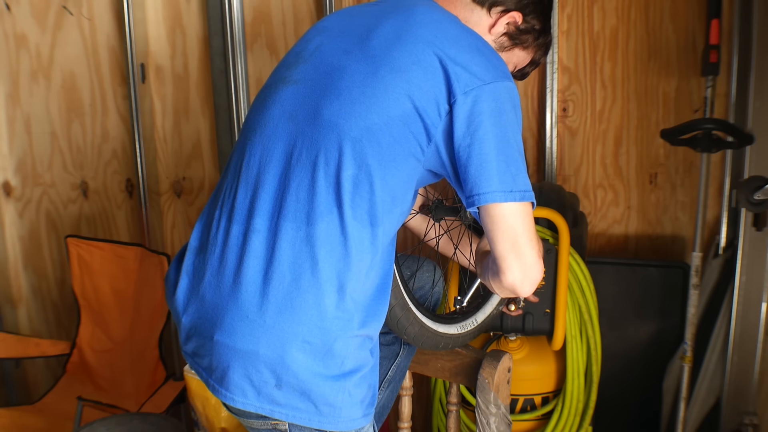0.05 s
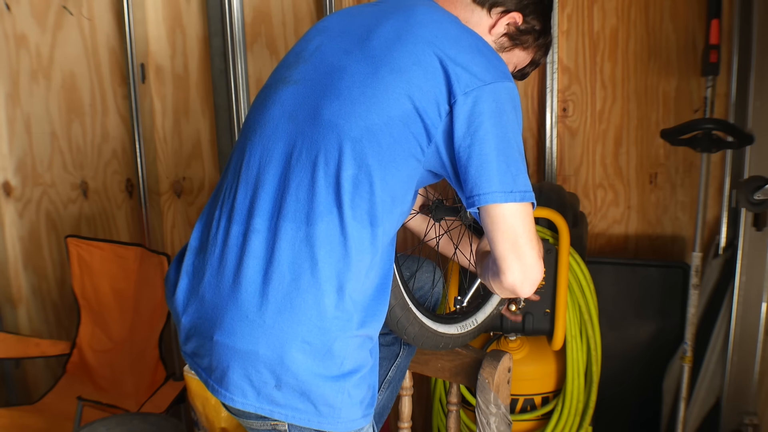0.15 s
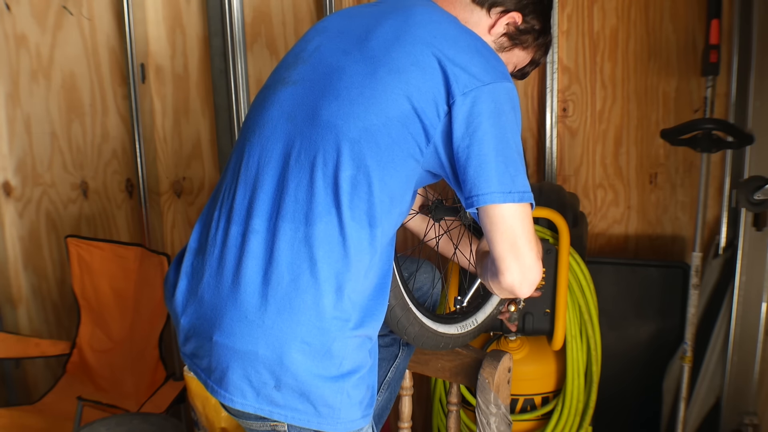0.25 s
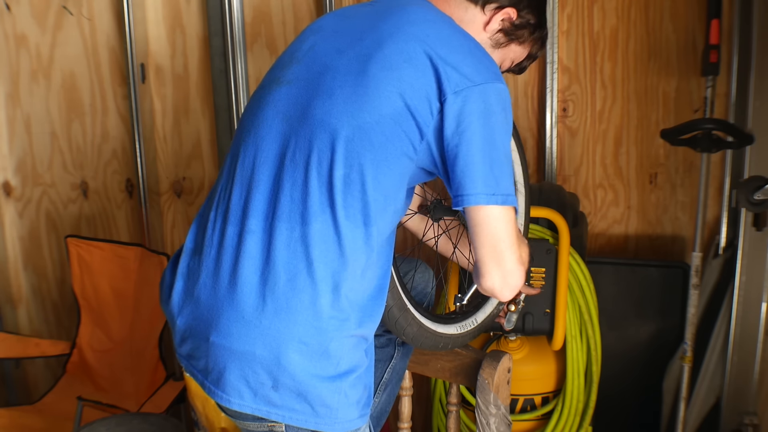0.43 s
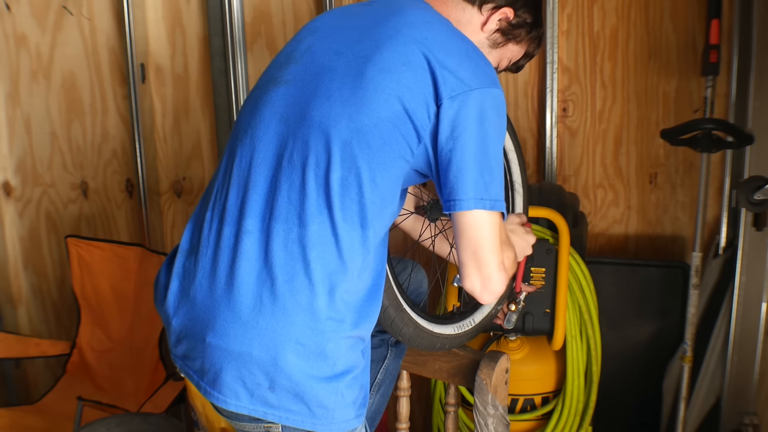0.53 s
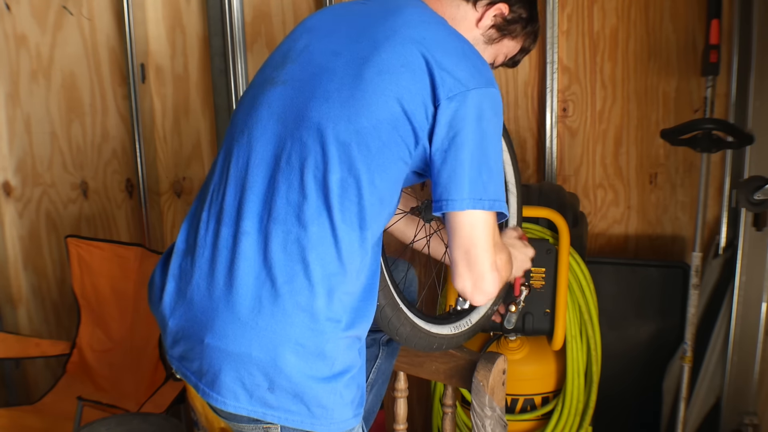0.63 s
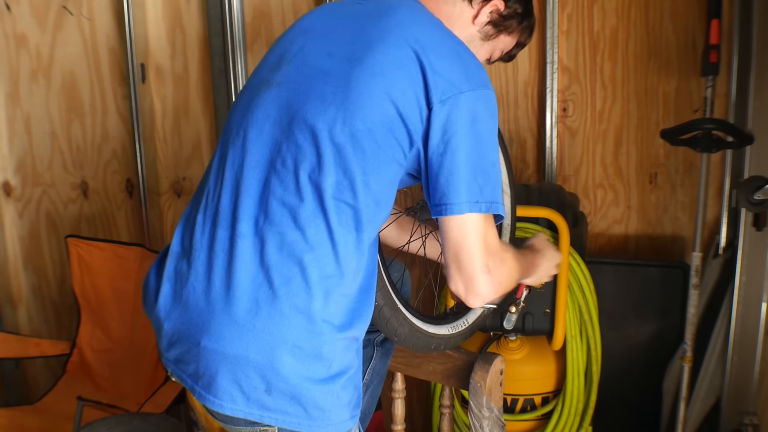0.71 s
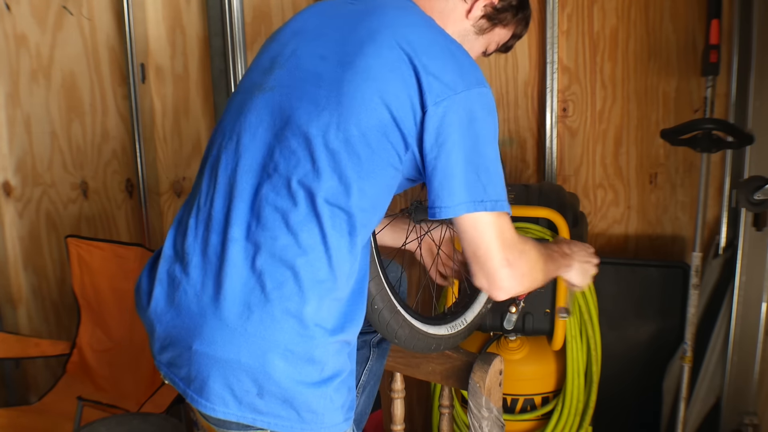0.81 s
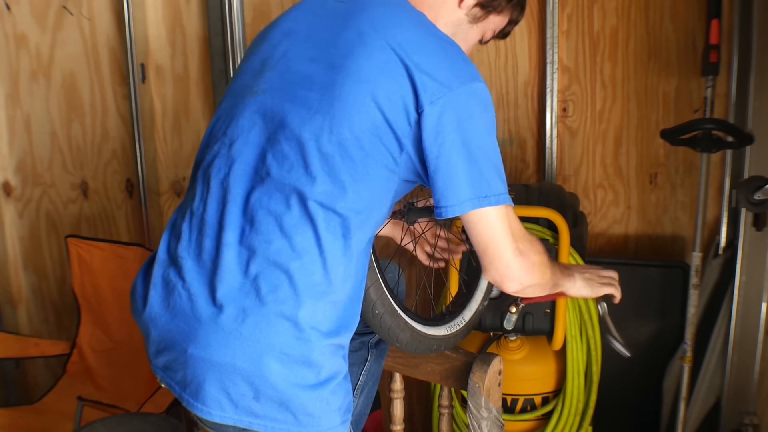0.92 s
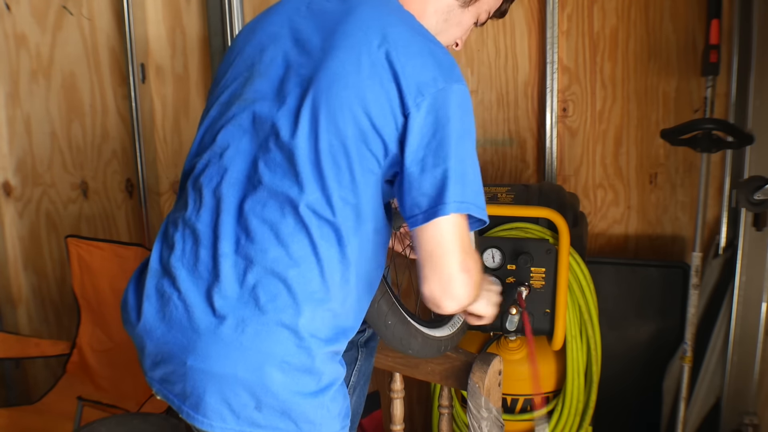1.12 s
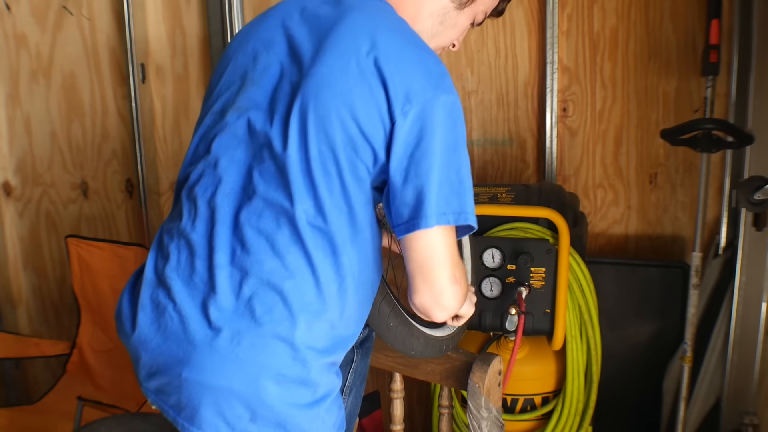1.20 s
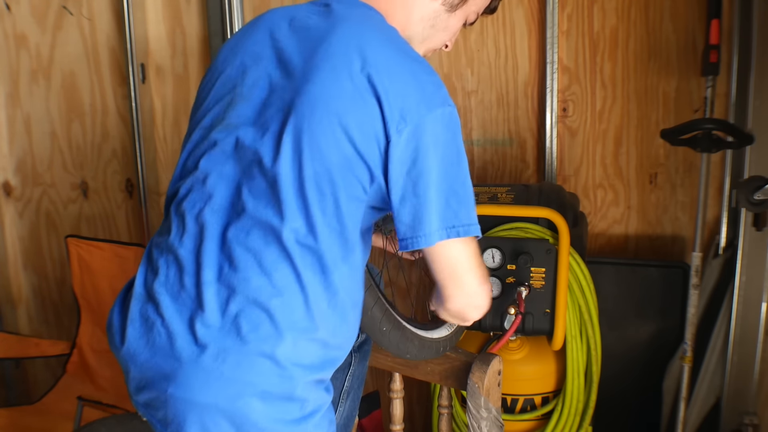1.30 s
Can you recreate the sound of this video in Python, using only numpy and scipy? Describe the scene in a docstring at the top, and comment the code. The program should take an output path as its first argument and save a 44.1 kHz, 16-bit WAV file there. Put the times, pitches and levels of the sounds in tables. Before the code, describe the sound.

In a small wooden shed, a quick burst of air escapes from a hose being pulled off a bicycle tyre. A light clatter and a hollow knock follow, with faint wheel clinks and shirt rustle over a low hum.

```python
"""Air hose pulled off a bicycle tyre

In a small wooden shed, compressed air leaks past the chuck, spits once as it is loosened and bursts out
as it lets go: each jet is turbulent noise. Impacts excite damped modes as the chuck knocks free and
chatters on the wheel, the dropped hose end bounces on something hollow and the wheel clinks faintly.
A shirt rustles over a low hum. The sound is nearly mono."""
import sys
import numpy as np
from scipy import signal
from scipy.fft import rfft, irfft
from scipy.io import wavfile

SR = 44100
rng = np.random.default_rng(int(sys.argv[2]) if len(sys.argv) > 2 else 0)


def transcribe(signal):
    """Save signal, clipped to [-1, 1], as a 16-bit WAV file at the path in sys.argv[1]."""
    frames = np.atleast_2d(signal).T
    limited = np.clip(frames, -1, 1)
    pcm = np.round(limited * 32767).astype(np.int16)
    wavfile.write(sys.argv[1], SR, pcm)


N = 59535
T = np.arange(N) / SR

# Air leaking past the seal of the chuck. Each row: time in seconds, level in dB.
LEAK_LEVEL = [(0, -42.5), (.08, -51), (.2, -51.5), (.29, -58), (.33, -46), (.37, -33.5), (.4, -96)]
# Two puffs of air. Each lists: time of the peak in seconds, peak level in dB, depth of the swell
# under the peak in dB, swell time constant in seconds, decay time constant in seconds.
SPIT_SHAPE = (.2478, -23.8, 7.5, .012, .0038)
BURST_SHAPE = (.4055, -16.3, 6.5, .019, .012)
# Spectra of the air jets. Each row: frequency in Hz, relative level in dB.
LEAK_SPECTRUM = [(1000, -10), (2800, -6), (4000, 1), (5200, -4), (6500, 0), (9800, -1), (11200, -7.5),
                 (12500, 0), (15500, 1)]
SPIT_SPECTRUM = [(300, -16), (700, -24), (1400, -1.5), (1750, -13.5), (2200, 3.5), (2800, -8.5), (3600, -2),
                 (5000, -12.5), (6400, -8), (7800, -14.5), (8600, -8), (9800, -12.5), (11000, -28),
                 (13200, -17), (15500, -31)]
BURST_SPECTRUM = [(300, -19), (750, -22), (1100, -9.5), (1700, -4.5), (4000, -2.5), (7000, -3), (8000, 3.5),
                  (9000, 4), (9700, -3), (11500, -5), (14200, 0.5), (15600, -5.5)]
DRAIN_SPECTRUM = [(500, -19), (1200, -6.5), (2200, -3.5), (3000, -6.5), (4500, -1.5), (6300, 2.5),
                  (8000, -4.5), (10500, -8.5), (15500, -16)]

# Contacts: the chuck knocks free and chatters, the hose end lands, the handled wheel clinks.
# Each row: start in seconds, relative level in dB.
CHUCK_CONTACTS = [(.5297, 0), (.5355, -5), (.544, -11), (.567, -15)]
CHATTER_CONTACTS = [(.588, -2.5), (.5925, -0.5), (.5985, -2.5), (.6045, -1.5), (.609, 0.5), (.616, 0),
                    (.6245, -1.5), (.652, -18), (.688, -9), (.752, -13.5)]
LANDING_CONTACTS = [(1.0068, -1), (1.011, 0), (1.0175, -1), (1.0225, -3), (1.027, -8), (1.041, -13),
                    (1.066, -16)]
CLINK_CONTACTS = [(1.218, -11), (1.25, -16.5), (1.275, -15)]
# Modes of the struck bodies. Each row: frequency in Hz, level in dB, time to fall 60 dB in seconds.
CHUCK_MODES = [(1660, -30, .03), (1770, -33, 0.046), (2260, -27.5, .035), (2720, -35, 0.029)]
WHEEL_MODES = [(648, -46, 0.14), (1224, -56, 0.91), (1288, -38.5, 0.2), (1665, -34, 0.042),
               (1712, -54.5, 0.58), (1962, -45, 0.17), (2837, -38, 0.32), (2740, -42, 0.59), (2875, -54, 1),
               (2830, -27.5, 0.032), (2866, -36, 0.22), (3114, -34.5, 0.13), (3340, -44, 0.097),
               (3500, -54, .22), (4110, -35.5, 0.071), (4865, -52, 0.18)]
HOLLOW_MODES = [(551.6, -34.5, 0.13), (588, -39, .1), (2155, -29, 0.026), (2450, -29, 0.026),
                (2930, -33.5, 0.03), (3260, -47, 0.05)]
# Spectra of the crack at each contact. Each row: frequency in Hz, relative level in dB.
CHUCK_CRACK = [(300, -21), (700, -5), (1100, -15), (1650, 1.5), (2700, -2), (4200, -14), (9000, -28),
               (15500, -34)]
WHEEL_CRACK = [(150, -14.5), (400, -22.5), (750, -6.5), (1000, -11), (1600, -3.5), (2300, -2.5), (3020, 6),
               (3750, -13.5), (4200, -5.5), (5400, -18.5), (8600, -12), (10500, -24), (15500, -23)]
HOLLOW_CRACK = [(200, -26), (420, -7.5), (560, -6), (760, -14.5), (1600, -14), (2250, -1.5), (3100, -1.5),
                (3800, -27), (6000, -35), (8800, -31.5), (10500, -63), (15500, -53)]

# Reverberation of the shed. Each row: frequency in Hz, time to fall 60 dB in seconds.
SHED_DECAY = [(200, 0.32), (1000, 0.52), (3000, 0.41), (7000, 0.35), (14000, 0.27)]
# The shirt rustling as the body turns. Each row: time in seconds, level in dB.
RUSTLE_LEVEL = [(0, -46), (.09, -49), (.17, -51.5), (.33, -43), (.6, -45.5), (.85, -44), (.95, -49.5),
                (1.08, -48), (1.17, -42.5), (1.25, -42.5), (1.35, -44.5)]
# Spectra of the cloth and the steady ambience. Each row: frequency in Hz, relative level in dB.
RUSTLE_SPECTRUM = [(200, -9.5), (650, -1.5), (1300, 1), (2000, -1), (2900, -1.5), (3800, -8), (5500, -13),
                   (7500, -21.5), (10000, -37), (15500, -62)]
AMBIENCE_SPECTRUM = [(25, -9), (50, -2), (70, -6), (110, -10), (160, -7), (300, -9), (600, -8), (1200, -10),
                     (2000, -15), (3000, -17.5), (4500, -19), (7000, -30.5), (10000, -38.5), (15500, -61)]


def escaping_air():
    """Air under pressure forms turbulent jets: a leak, a spit, the burst and the draining hose."""
    leak = level(LEAK_LEVEL) * amp(1.2 * drift(40)) * noise(LEAK_SPECTRUM)
    spit = puff(SPIT_SHAPE, SPIT_SPECTRUM, rough_db=1.8, open_s=.001, hold_s=.004)
    burst = puff(BURST_SHAPE, BURST_SPECTRUM, rough_db=1.5, open_s=.003, hold_s=.005)
    drain = amp(-30.5) * fade(BURST_SHAPE[0], decay_s=0.1) * noise(DRAIN_SPECTRUM)
    return leak + spit + burst + drain


def puff(shape, spectrum, rough_db, open_s, hold_s):
    """Jet noise follows the flow: it swells as the seal lifts, jumps as it opens, dies with the pressure."""
    peak_s, peak_db, under_db, swell_s, decay_s = shape
    opening = np.clip((T - peak_s) / open_s + 1, 0, 1)
    swell = amp(-under_db * (1 - opening)) * np.exp(np.minimum(T - peak_s, 0) / swell_s)
    release = np.exp(-np.maximum(T - peak_s - hold_s, 0) / decay_s)
    return amp(peak_db + rough_db * drift(310)) * swell * release * noise(spectrum)


def knocks():
    """A struck body rings at its own natural frequencies, so chatter and clinks share the wheel's modes."""
    chuck = impacts(CHUCK_CONTACTS, CHUCK_MODES, CHUCK_CRACK, crack_db=-21.5, crack_s=.0033)
    chatter = impacts(CHATTER_CONTACTS, WHEEL_MODES, WHEEL_CRACK, crack_db=-19.5, crack_s=.0034)
    landing = impacts(LANDING_CONTACTS, HOLLOW_MODES, HOLLOW_CRACK, crack_db=-26.5, crack_s=.0034)
    clinks = impacts(CLINK_CONTACTS, WHEEL_MODES, WHEEL_CRACK, crack_db=-38, crack_s=.0034)
    return chuck + chatter + landing + clinks


def impacts(contacts, modes, crack_spectrum, crack_db, crack_s):
    """Modal superposition: each contact cracks briefly and rings every mode with a random strength."""
    force = np.sqrt(sum((amp(db) * fade(start, crack_s)) ** 2 for start, db in contacts))  # powers add
    sound = amp(crack_db) * tint(force * rng.choice([-1, 1], N), crack_spectrum)
    starts, contact_db = np.transpose(contacts)
    couplings = rng.standard_normal((len(starts), len(modes)))
    for (hz, mode_db, t60), coupling in zip(modes, couplings.T):
        strength = amp(contact_db + mode_db + np.abs(coupling) - 1.5)
        impulses = np.zeros(N)
        impulses[(starts * SR).astype(int)] = strength * np.sign(coupling)
        radius, angle = amp(-60 / (t60 * SR)), 2 * np.pi * hz / SR  # pole of a damped resonator
        feedback = [1, -2 * radius * np.cos(angle), radius * radius]
        sound = sound + signal.lfilter([0, np.sin(angle)], feedback, impulses + 1e-18)
    return sound


def shed(direct, build_s=0.0068, tail_db=-3, walls_db=-8):
    """Reverberation: close plank walls reflect densely, then a diffuse tail dies sooner in the treble."""
    hz = np.fft.rfftfreq(N, 1 / SR)
    white = rfft(rng.standard_normal(N))
    octaves_hz = 125 * 2. ** np.arange(8)
    tail = 0
    for centre, share in zip(octaves_hz, np.eye(len(octaves_hz))):
        band = irfft(white * at_hz(np.c_[octaves_hz, share], hz), N)
        tail = tail + band * np.exp(-np.log(1000) * T / at_hz(SHED_DECAY, centre))
    tail = unit_energy(tail * (1 - np.exp(-T / build_s)))
    walls = unit_energy(rng.standard_normal(N) * fade(start=0.0023, decay_s=0.0097))
    return direct + convolve(direct, amp(tail_db) * tail + amp(walls_db) * walls)


def shirt_rustle(grain_db=0.84):
    """Friction of cloth gives grainy noise that rises and falls as the body turns."""
    return level(RUSTLE_LEVEL) * amp(grain_db * drift(63)) * noise(RUSTLE_SPECTRUM)


def hum(hz=83.9, wander_hz=1.37, rms_db=-49.5, waver_db=2):
    """Random frequency and amplitude modulation make a low sine tone waver."""
    cycles = np.cumsum(hz + wander_hz * drift(7)) / SR
    return np.sqrt(2) * amp(rms_db + waver_db * drift(12.6)) * np.sin(2 * np.pi * cycles)


def ambience(db):
    """Stationary noise, strongest in the bass, forms a steady floor."""
    return amp(db) * noise(AMBIENCE_SPECTRUM)


def amp(db):
    """Amplitude grows tenfold for every 20 dB."""
    return 10 ** (np.asarray(db) / 20)


def rms_one(x):
    """Division by the rms gives unit power."""
    return x / np.sqrt(np.mean(x ** 2) + 1e-20)


def unit_energy(response):
    """A response of unit energy preserves the power of white noise."""
    return rms_one(response) / np.sqrt(N)


def at_hz(points, hz):
    """Interpolation on a log-frequency axis treats all octaves alike."""
    frequencies, values = np.transpose(points)
    return np.interp(np.log(np.maximum(hz, 1)), np.log(frequencies), values)


def level(points):
    """Interpolation in decibels gives a gain envelope of exponential segments."""
    return amp(np.interp(T, *np.transpose(points)))


def fade(start, decay_s):
    """Exponential decay follows a sudden onset."""
    return (T >= start) * np.exp(-np.maximum(T - start, 0) / decay_s)


def noise(spectrum):
    """Spectral weighting turns white noise into coloured noise, here of unit power."""
    gain = amp(at_hz(spectrum, np.fft.rfftfreq(N, 1 / SR)))
    return rms_one(irfft(rfft(rng.standard_normal(N)) * gain, N))


def drift(rate_hz):
    """Low-pass filtered noise wanders at random, with unit rms."""
    rolloff = 1 + (np.fft.rfftfreq(N, 1 / SR) / rate_hz) ** 4
    return rms_one(irfft(rfft(rng.standard_normal(N)) / rolloff, N))


def convolve(x, response):
    """A linear system convolves its input with its impulse response."""
    return signal.fftconvolve(x, response)[:N]


def tint(x, spectrum):
    """A minimum-phase filter colours a sound causally, keeping the power of white noise."""
    gain = rms_one(amp(at_hz(spectrum, np.fft.rfftfreq(2 * N, 1 / SR))))
    cepstrum = irfft(np.log(gain))[:N] * np.where(np.arange(N) > 0, 2, 1)
    response = irfft(np.exp(rfft(cepstrum, 2 * N)))[:N]
    return convolve(x, response)


def scene():
    """Mid-side stereo: all sources are central; faint scattered sound and ambience form the side."""
    mid = shed(escaping_air() + knocks()) + shirt_rustle() + hum() + ambience(db=-45.5)
    scattering = unit_energy(rng.standard_normal(N) * fade(start=0, decay_s=0.025))
    side = amp(-31.5) * convolve(mid, scattering) + ambience(db=-68.5)
    return np.array([mid + side, mid - side])


def record(dry, hiss_db=-66, cutoff_hz=15800):
    """Self-noise adds a faint hiss to each channel; a steep low-pass filter limits the bandwidth."""
    hiss = amp(hiss_db) * rng.standard_normal((2, N))
    lowpass = signal.ellip(12, .1, 80, cutoff_hz, fs=SR, output="sos")
    return signal.sosfilt(lowpass, dry + hiss)


dry = scene()
out = record(dry)
transcribe(out)
```